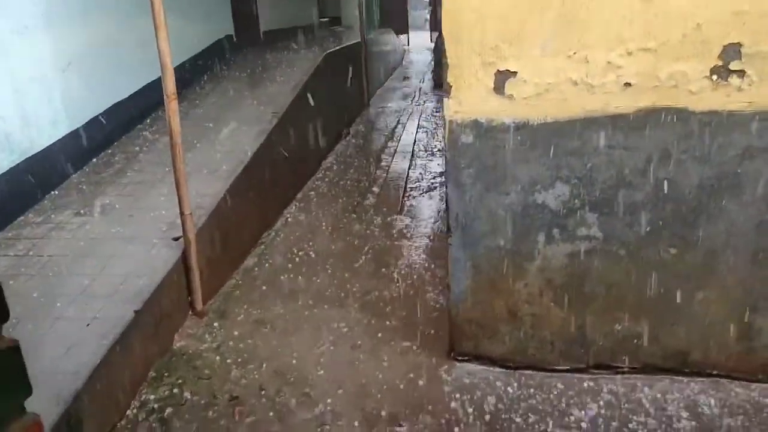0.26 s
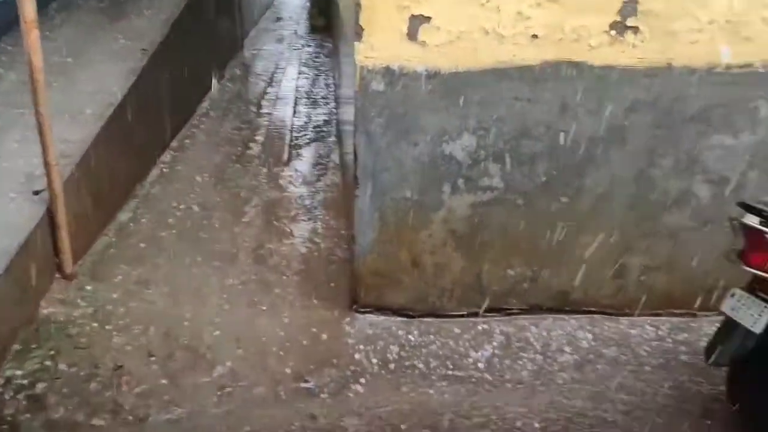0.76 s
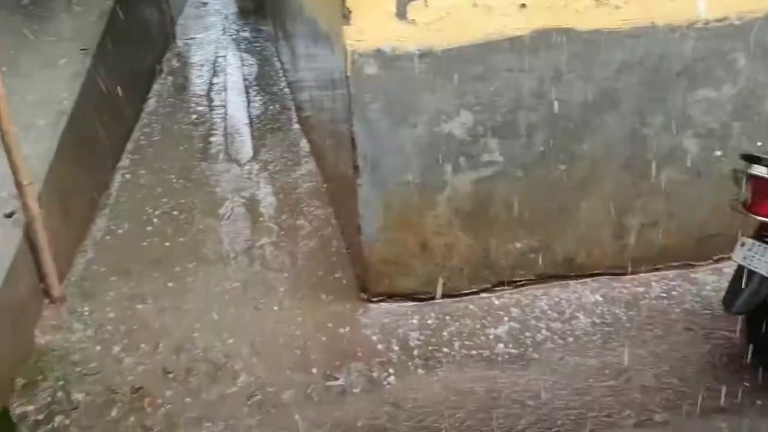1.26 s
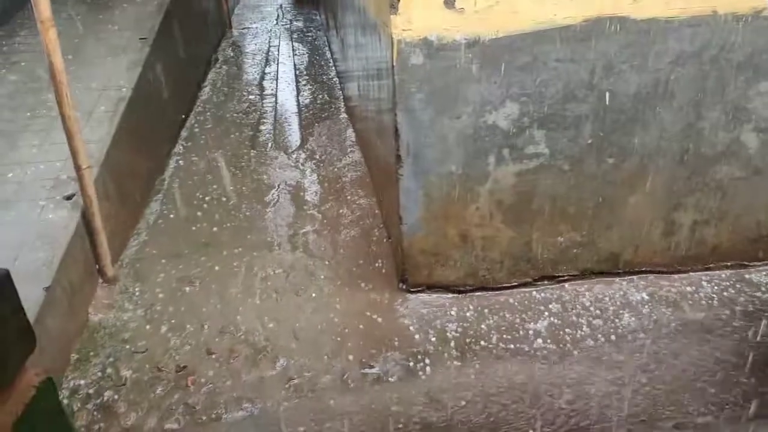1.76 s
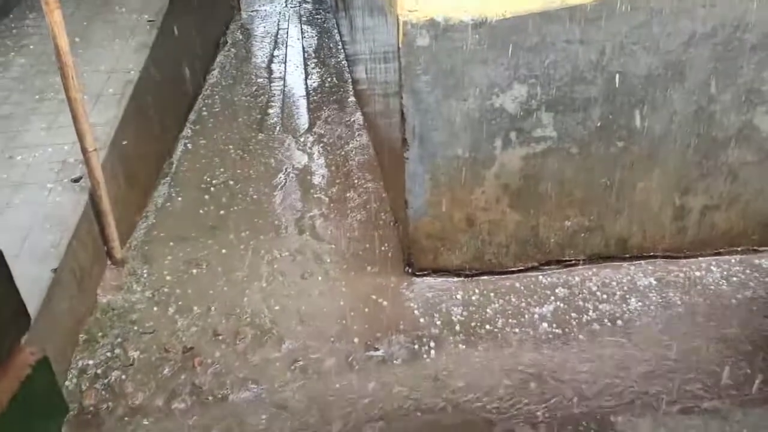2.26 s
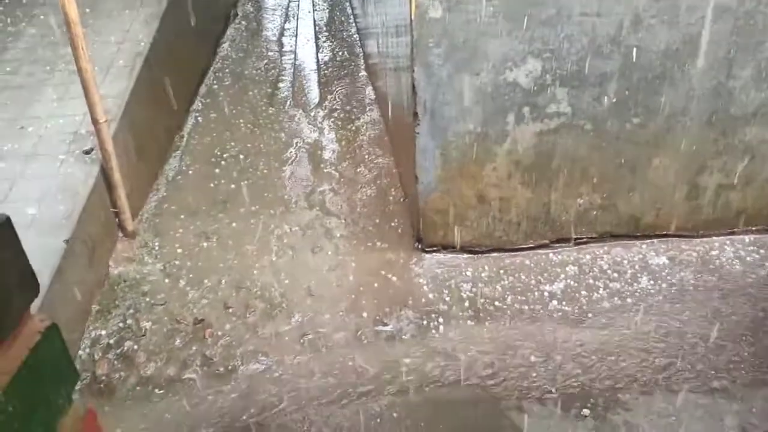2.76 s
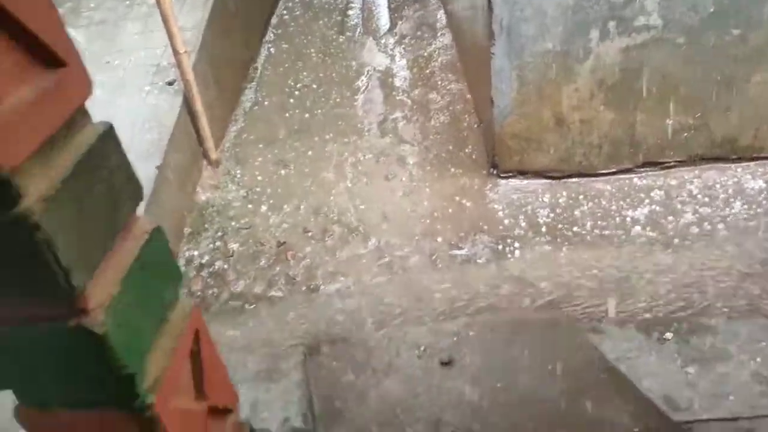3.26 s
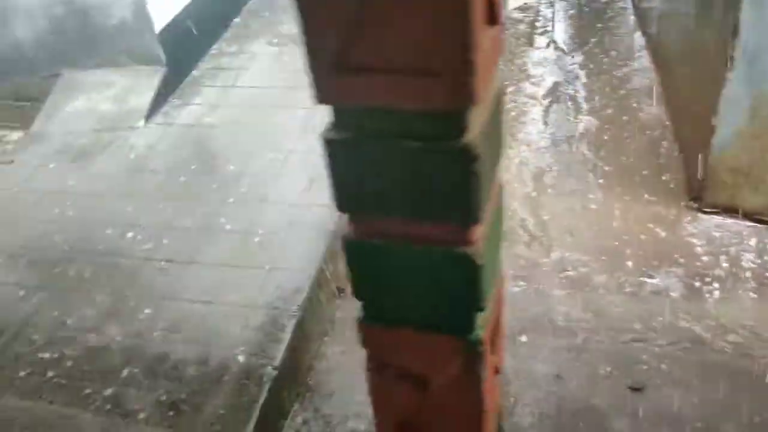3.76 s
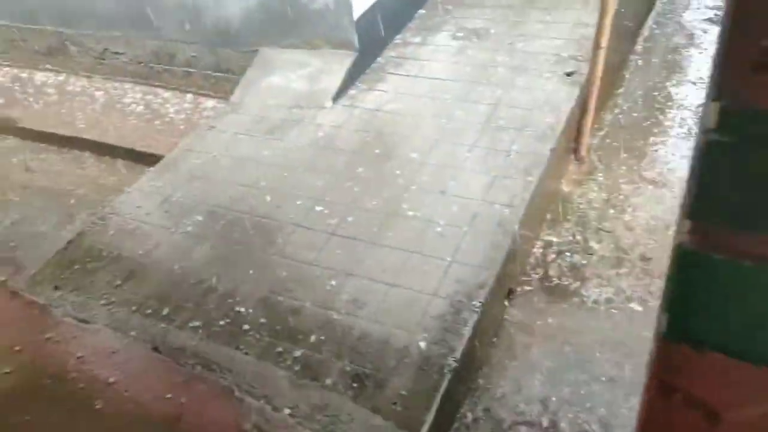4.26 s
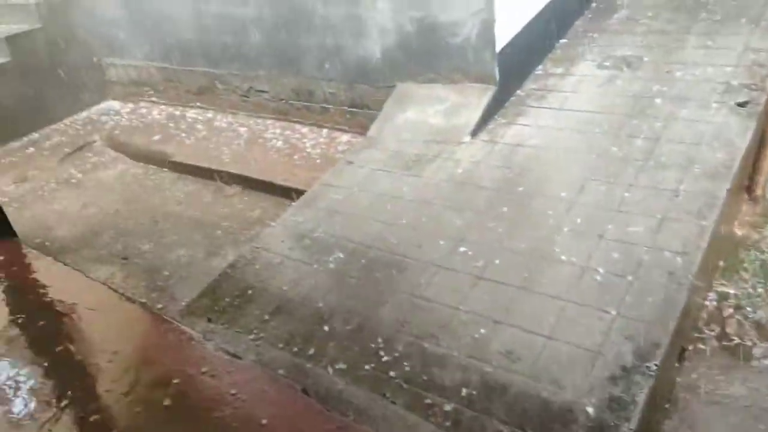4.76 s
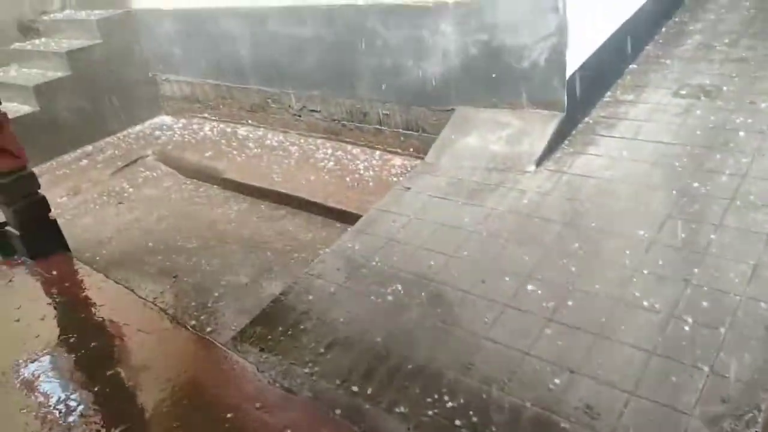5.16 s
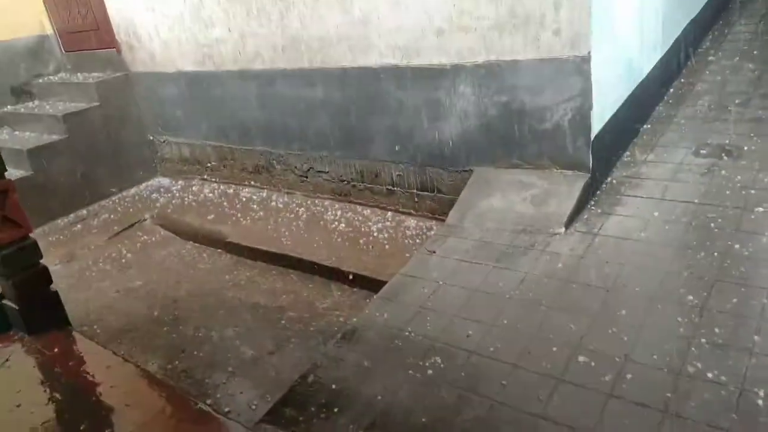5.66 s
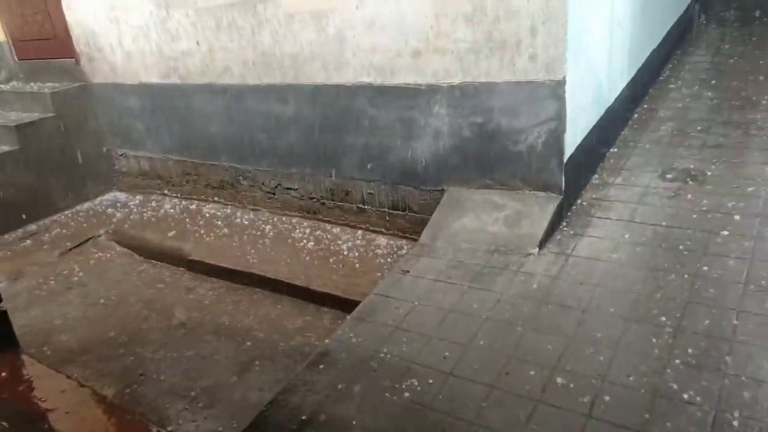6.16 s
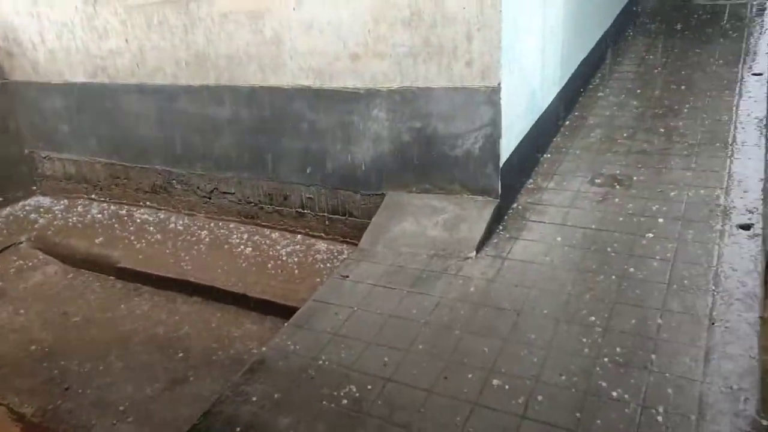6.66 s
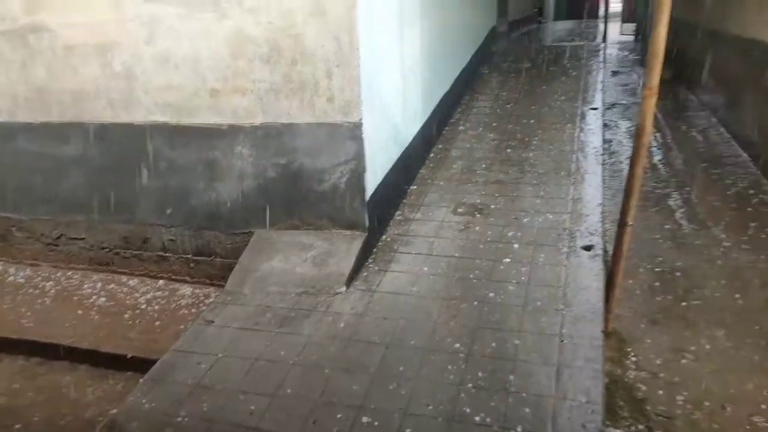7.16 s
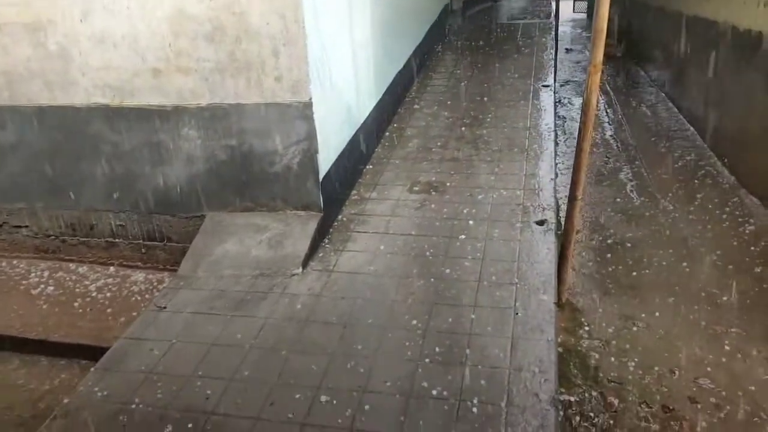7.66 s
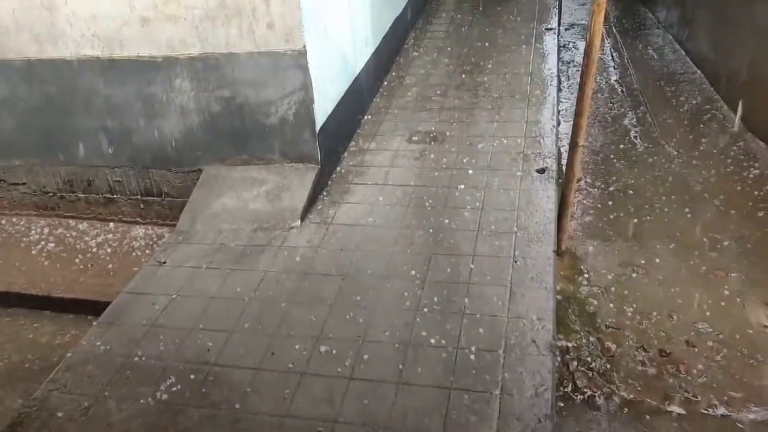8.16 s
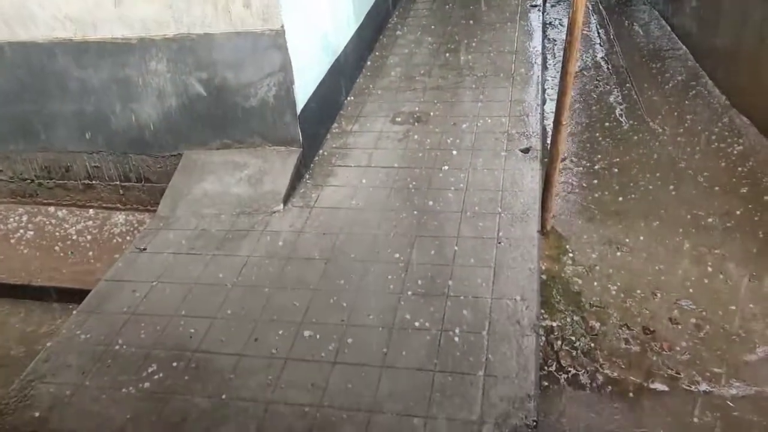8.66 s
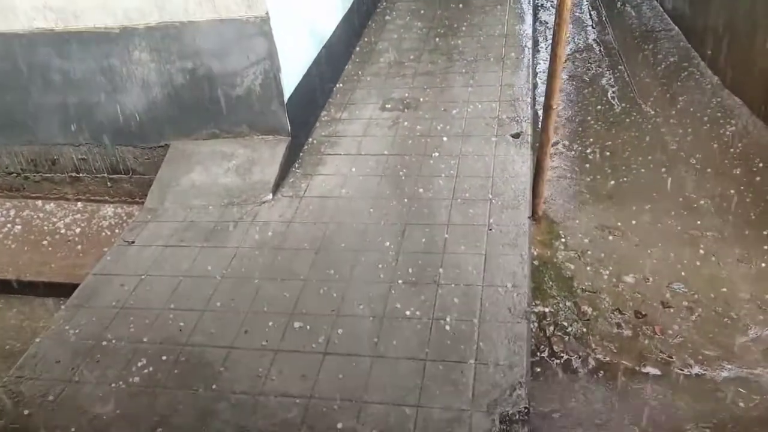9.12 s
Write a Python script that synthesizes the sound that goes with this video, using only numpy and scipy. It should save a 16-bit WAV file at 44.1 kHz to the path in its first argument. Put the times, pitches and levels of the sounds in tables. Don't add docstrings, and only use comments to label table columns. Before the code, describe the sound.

Dense, bright rain hiss runs throughout about 9.4 seconds, with grainy near drops and only a weak low roar. Hailstones strike irregularly, many per second, on roofing, tile, concrete, puddles and hollow plastic. From 0 to 1.4 s there are thuds, ticks and low hollow knocks, with cracks near 0.35 s and a tiny dropout at 1.1. A hard snap lands at 1.5. The rain eases slightly around 2.7-3.2 s as a tight cluster of ringing cracks hits at 2.9-3.05. Strong strikes follow at 4.1-4.9, 5.7 and 6.05-6.65, with faint low sheet booms near 5.8 and 6.3. The sharpest crack comes at 7.8, then more at 8.2-8.6 and 9.0-9.3, while rain swells near 9 and dips at the end. Phone microphone under a porch: near-mono, dull above the upper treble, short wall echoes, clipped crackles and small pops on the loudest stones.

```python
import sys
import numpy as np
from scipy import signal
from scipy.fft import rfft, irfft, next_fast_len
from scipy.io import wavfile
from scipy.ndimage import uniform_filter1d, minimum_filter1d

SR = 44100
rng = np.random.default_rng(int(sys.argv[2]) if len(sys.argv) > 2 else 0)


def convert_level_to_amplitude(level_db):
    exponent = np.asarray(level_db, float) / 20
    return 10 ** exponent


def transcribe(u):
    v = np.clip(np.atleast_2d(u).T, -1, 1)
    q = np.round(v * 32767).astype(np.int16)
    wavfile.write(sys.argv[1], SR, q)


N = 414089
EDGE_HZ, TOP_HZ = 9660, 15850

# time_s, level_db
RAIN_LEVEL = [(0.0, -17.5), (0.91, -16.5), (1.49, -15.5), (2.67, -19), (2.88, -17.5), (3.08, -21),
              (3.22, -20), (3.9, -17.5), (4.76, -16.5), (5.23, -16.5), (5.65, -17.5), (7.0, -16.5),
              (9.05, -14.5), (9.39, -20)]
# freq_hz, density_db
RAIN_COLOUR = [(18, -39.5), (30, -26), (208, -21.5), (302, -8.5), (637, -10.5), (1090, -4.5), (1470, -6.5),
               (2240, -3), (4730, -5.5), (5970, 1), (7370, -7), (7900, -3), (10300, -47), (17400, -120)]
# freq_hz, gain_db
CRACK_COLOUR = [(100, -10), (400, -3), (1000, 2), (2500, 4), (4600, -0.5), (6000, 5), (7300, -2), (8000, 1)]
# freq_hz, t60_s
YARD_T60 = [(300, 0.88), (1000, 0.53), (3000, 0.52), (7000, 0.32)]
# freq_hz, gain_db
BAND_EDGE = [(7200, -1), (7650, -7), (7960, -24.5), (8255, -21.5), (8290, -41.5), (9500, -67)]
# start_s, peak_db
SHEET_BOOMS = [
    (0.041, -35),
    (0.388, -36),
    (1.105, -35),
    (2.341, -38),
    (5.822, -30),
    (6.343, -28),
    (6.68, -36),
    (8.561, -32),
]
# start_s, peak_db, ring_hz
CLEAR_RINGS = [(0.356, -14, 1550), (1.086, -9, 2880), (2.069, -5, 7130), (2.893, -10, 2067),
               (2.951, -15, 7493), (2.989, -10, 6890), (3.011, -4, 5450), (3.03, -2, 6373),
               (3.035, -19, 7500), (3.522, -6, 6630), (4.04, -8, 2680), (4.918, -1.5, 6250),
               (5.735, -8, 4420), (5.803, -11, 3445), (6.064, -9, 1920), (6.308, -3, 6320),
               (6.463, -20, 1560), (6.797, -13, 5600), (6.852, -3, 2350), (6.862, -19, 1450),
               (7.077, -9, 4100), (7.537, -8, 7200), (8.534, -4, 6804), (8.534, -12, 7360),
               (8.557, -1, 6230), (9.197, -6, 6540),
               (1.287, -11.5, 1010),
    (4.002, -16, 1910),
    (3.7, -10, 1900),
    (0.9, -25, 1400),
]
# start_s, peak_db
NEAR_TICKS = [(.6404, -13), (1.146, -12), (1.6254, -4), (1.9884, -1), (2.2372, -18), (2.339, -9),
              (3.2319, -5), (4.1754, -8), (4.69, -14), (4.8325, -5), (5.561, -13), (6.3705, -11),
              (6.6991, -10), (7.4512, -5), (7.7987, -8), (8.3895, -5.5), (8.4158, -7), (9.049, -8),
              (2.994, -10), (6.077, -1), (.0029, -4), (.52, -10), (1.3191, -7), (1.5859, -7), (1.6524, -9),
              (1.699, -10), (1.8678, -8.5), (2.0189, -7.5), (2.0338, -9), (2.7714, -9), (4.1392, -6),
              (4.4055, -11), (4.6546, -12), (4.8796, -10), (5.3436, -10), (5.7525, -5), (6.344, -8),
              (6.9109, -7), (7.186, -10), (8.613, -9), (8.7834, -8), (9.0832, -9)]
# start_s, peak_db, ring_hz, echo_db
ROOF_HITS = [(.001, 0, 2360, 6.5), (.080, -3.5, 1380, 24), (.208, 4.5, 2900, -4.5), (0.774, 1.5, 1020, -16),
             (1.241, -8, 1780, 0), (1.287, -0.5, 1050, -6), (1.645, -2.5, 1870, 4.5),
             (2.159, 2.5, 2270, -17), (2.405, 1.5, 996, -6.5), (2.706, 6.5, 2880, -9.5),
             (3.032, 3, 4000, -5.5), (3.404, -4.5, 1820, 6), (3.615, 4.5, 2870, -9.5),
             (4.042, -1, 2800, -3.5), (4.441, 5, 2030, -8), (4.7657, 9, 1020, -10.5),
             (4.877, 0, 3800, -13.5), (4.920, -2, 2920, 3), (5.133, 1, 1780, -12.5), (5.343, -3, 2870, 5),
             (5.379, -5.5, 2000, 10), (5.738, 9.5, 2950, -12.5), (6.065, 6.5, 1860, -13),
             (6.630, -2, 2270, 3.5), (6.725, 3, 1950, -6), (6.799, 3, 970, -21), (8.479, 4, 2960, -10.5),
             (8.538, 2.5, 1450, -3.5), (8.999, 5.5, 2780, -9.5), (9.381, 5, 2190, -2.5)]
# start_s, peak_db, ring_hz, echo_db
TILE_HITS = [(.507, 3, 1950, -10), (1.088, 2, 2900, -5), (1.317, 2.5, 2720, -13), (2.868, -1.5, 2930, -8),
             (2.894, 10.5, 2850, -16), (3.525, 7.5, 2720, -15.5), (3.574, 1.5, 2360, -6.5),
             (3.860, 2, 3770, -7.5), (4.295, -5, 3250, -7), (4.311, 2.5, 3500, -10.5),
             (4.457, 8, 3400, -15), (4.68, 5, 3020, -9.5), (4.897, 10, 2750, -21), (5.452, 1.5, 2340, -12),
             (5.691, 6.5, 4270, -8), (6.145, 2.5, 4350, -2), (6.853, 3.5, 2400, 0), (7.081, 3.5, 4040, -7),
             (7.451, 4, 3000, -12.5), (7.52, 5, 3040, -12), (7.539, -1, 3400, -8.5),
             (7.651, 3.5, 2410, -8.5), (7.886, 4, 2920, -25), (8.207, 7.5, 3600, -14.5),
             (8.3873, 4.5, 2920, -24), (8.691, -2.5, 2020, -8.5), (9.046, 3.5, 2780, 0),
             (1.586, -12, 2730, -19), (.124, -2, 2120, -6), (7.12, 1, 2620, -6.5)]
# start_s, peak_db, ring_hz, echo_db
CONCRETE_HITS = [(.325, 5.5, 3430, -6), (.348, 8, 960, -9), (0.471, -0.5, 2580, -15),
                 (1.5136, 10, 2850, -16), (1.626, 2, 2340, -17), (1.865, 0.5, 2680, -2),
                 (1.981, 5, 2500, -0.5), (2.031, 1, 2960, -1), (2.320, -6, 1630, -5),
                 (2.951, 6.5, 3060, -9.5), (2.986, 6, 4100, -2), (3.014, 3, 3400, -5), (3.231, -1, 2450, 5),
                 (4.127, 8.5, 2020, -8.5), (4.229, 6.5, 2460, -9), (4.365, 3, 3020, -9.5),
                 (4.394, 9, 2300, -13), (4.773, 9, 4400, -23), (5.158, 4.5, 2980, -20),
                 (5.806, 3, 2500, -4), (7.805, 13, 2570, -8), (7.868, 5.5, 2500, -9),
                 (7.950, 7.5, 2490, -23), (8.063, 3.5, 2790, -1), (8.295, 8, 3980, -10),
                 (8.4192, 10.5, 3030, -8.5), (9.149, 2, 4070, -8.5), (9.157, 4.5, 2830, -8),
                 (9.200, 7, 2170, -12.5), (9.288, 7.5, 2670, -8.5)]
# start_s, peak_db, ring_hz, echo_db
PUDDLE_HITS = [(.639, 5, 2830, -15.5), (.822, -0.5, 2640, -9), (1.144, 1.5, 1080, 1),
               (1.163, -11, 1270, -3.5), (1.370, 1, 2860, -4.5), (1.429, 1.5, 1170, -13),
               (1.782, 1.5, 2960, -5.5), (2.072, 6, 2970, -11), (2.139, 0, 2270, 7),
               (2.233, -2.5, 3300, -4), (2.642, -3.5, 3000, 1.5), (2.753, 1, 1760, -13),
               (2.914, 5.5, 2440, -11), (3.594, 3.5, 2040, -4), (3.693, -1.5, 3000, 1.5),
               (4.003, 4, 1980, -7), (5.874, -2, 2400, 3), (6.038, 6.5, 2500, -8.5), (6.308, 3, 2270, -2),
               (6.345, 0.5, 2700, -3), (6.459, 3.5, 4300, -3.5), (6.645, 7, 1960, -7.5),
               (6.894, 6.5, 2190, -11.5), (7.04, -1, 2900, -1), (7.210, 3.5, 2970, -7),
               (7.311, 1.5, 3410, -7.5), (7.428, 4.5, 2580, -10), (7.959, 7.5, 3280, -7.5),
               (8.558, 8, 2400, -8), (8.937, 3.5, 2970, -8.5)]
# start_s, peak_db, ring_hz, echo_db
PAVING_HITS = [(0.168, -9, 2070, -8), (0.18, -1, 2840, -11), (0.394, -2.5, 2800, -8),
               (0.438, -0.5, 1810, -3.5), (0.713, -2, 2110, -6.5), (0.86, -2.5, 2280, -9.5),
               (0.897, -4.5, 3620, -1.5), (1.005, -3, 2220, -17), (1.058, -2.5, 3270, -8),
               (1.124, -12.5, 3620, 2), (1.243, 0.5, 1840, -7.5), (1.318, -4, 1770, -8),
               (1.533, 4.5, 2710, -15), (1.583, -6, 2800, 0.5), (1.713, 2, 2450, -13),
               (2.129, 0, 2870, -10), (2.361, -2.5, 2970, -7.5), (2.374, -9.5, 2150, -10),
               (2.614, 2, 2740, -15.5), (2.681, -3, 2970, -4.5), (2.77, -7, 2330, -14),
               (3.014, 9, 3280, -21.5), (3.289, -1, 2760, -11), (3.906, -5, 2800, -3.5),
               (4.366, -7.5, 2970, -6.5), (4.635, 0, 3160, -4.5), (4.863, 1, 1210, -12.5),
               (4.879, -2.5, 3820, -2), (4.921, 0, 2710, -12.5), (4.971, 4.5, 3920, -20.5),
               (5.05, -3, 4440, -6.5), (5.278, 0.5, 2850, -10), (5.411, -3, 2520, -1),
               (5.516, -5.5, 3060, 0.5), (5.848, -4.5, 3270, -11), (6.018, -1.5, 3140, -5),
               (6.27, -0.5, 2890, -6.5), (7.003, -5, 3530, -10), (7.184, -5, 3270, -16.5),
               (7.408, -5, 2900, -13), (7.727, -3.5, 4230, -3.5), (7.929, -8, 3060, -15),
               (8.276, 3.5, 3000, -9.5), (8.728, -3.5, 2400, -2), (8.783, -1, 2840, -5),
               (8.821, -9.5, 4090, -19.5), (8.957, 3.5, 4100, -10.5), (9.104, -2, 4220, -7),
               (9.159, -2.5, 2850, -8), (9.358, -3.5, 3010, -6)]
# start_s, peak_db, ring_hz, echo_db
HOLLOW_HITS = [(.040, -3, 990, -1.5), (.122, -5, 950, -5), (.508, -11, 910, -1), (.640, -9.5, 1050, 1.5),
               (.788, -11, 990, -10), (1.002, -9, 1300, -3), (1.159, -5.5, 1100, -12.5),
               (1.288, -6, 1020, -17), (1.322, -6.5, 1200, -6.5), (1.663, -9, 1000, -10),
               (1.515, -7, 1140, -5), (2.099, -12, 1000, -9), (2.895, -3, 1010, -9), (3.426, -5, 900, -10),
               (6.817, -7, 1020, -5), (6.863, -9, 1000, -11), (7.665, -9.5, 1000, -6),
               (8.427, -6.5, 950, -10.5), (8.575, -4.5, 1900, -16), (5.361, -9, 706, -2),
               (5.742, -4, 1040, -1), (5.698, -10, 1500, 3)]
# bass_tilt_db, treble_tilt_db
SURFACE_TILTS = [
    (2.5, 5),
    (-13, 0),
    (-1, 7.5),
    (-2, 1),
    (-2, 2.5),
    (5.5, -4),
]
# centre_s, low_hz, high_hz, level_db
SIDE_BURSTS = [
    (2.823, 4550, 6400, -29),
    (3.705, 5500, 7100, -25),
    (5.005, 5460, 8100, -20),
    (6.956, 5500, 7700, -21),
    (7.699, 4900, 8900, -20),
    (8.744, 4722, 8250, -24),
]
# start_s, peak_db, smear_db (relative)
CUT_PEAKS = [(1.1009, -25.0, -48.0), (1.5159, -34.0, -39.0), (2.8977, -29.0, -36.0), (2.9164, -33.0, -34.0),
             (3.0159, -27.0, -25.0), (3.0359, -29.0, -26.0), (3.5254, -32.0, -45.0), (4.1332, -34.0, -35.0),
             (4.4583, -31.0, -45.0), (4.6808, -35.0, -40.0), (4.7716, -27.0, -48.0), (4.7758, -28.0, -46.0),
             (4.9232, -29.0, -27.0), (5.6919, -37.0, -37.0), (5.7404, -25.0, -30.0), (6.0687, -27.0, -31.0),
             (6.3114, -36.0, -44.0), (6.6495, -32.0, -33.0), (6.8553, -34.0, -29.0), (7.4517, -24.0, -32.0),
             (7.8096, -27.0, -25.0), (8.2095, -26.0, -37.0), (8.2967, -30.0, -34.0), (8.3891, -26.0, -36.0),
             (8.4242, -33.0, -36.0), (8.5592, -25.0, -28.0), (8.5626, -25.0, -28.0), (8.5753, -36.0, -20.0),
             (9.0473, -34.0, -33.0), (9.16, -40.0, -26.0),
             (5.7452, -36, -18), (8.572, -38, -15), (8.9385, -44, -25), (9.2014, -40, -36),
                   (2.9915, -33, -42), (3.0225, -31, -40), (4.7672, -30, -45), (4.898, -42, -24),
                   (4.9205, -31, -45), (6.0405, -38, -36), (6.6455, -40, -45), (1.105, -33, -45),
                   (8.4195, -34, -45), (1.1167, -43, -45)]
# from_s, floor_hz
CUT_FLOOR = [(0, 8600), (2.8, 9600), (3.0, 10200), (3.1, 8600), (4.8, 10300), (5.6, 8600), (6.05, 10600),
             (6.2, 9400), (7.4, 9500), (7.7, 10200), (8.1, 8800), (8.5, 10000), (8.9, 11200), (9.0, 11600),]
# start_s, peak_db
EDGE_SPILLS = [
    (.349, -32),
    (3.241, -37),
    (7.801, -40),
]
# start_s, size_db, direction_sign, recovery_ms
REST_JUMPS = [(0.349, -27, -1, 3.7), (1.5155, -29, -1, 8.5), (2.071, -30, -1, 2.6), (2.151, -29, -1, 14),
              (2.895, -18, -1, 1.9), (3.017, -13, 1, 5.5), (3.5256, -24, 1, 20), (4.126, -24, -1, 34),
              (4.6816, -16, -1, 24), (4.7712, -2, 1, 1), (4.898, -25, 1, 17.0), (4.9216, -21, -1, 18),
              (5.74, -9.5, 1, 2), (6.07, -38, -1, 11), (6.314, -29, -1, 8.9), (6.648, -6, 1, 1.3),
              (6.855, -26, -1, 20), (7.4507, -24, 1, 20), (7.5397, -31, -1, 24), (7.809, -18, 1, 2.9),
              (8.2075, -24, -1, 18), (8.295, -25, -1, 26), (8.426, -20, -1, 40), (8.5631, -29, -1, 3.5),
              (8.938, -27, -1, 25), (9.047, -22, -1, 31), (9.16, -21.5, 1, 12)]
# centre_s, half_length_s, gain_db
LOST_BUFFER = (1.106, .0055, -13)


def evened(x):
    return x / np.sqrt(np.mean(x ** 2) + 1e-20)


def read(points, hz):
    f, value = np.transpose(points)
    return np.interp(np.log(hz + 1), np.log(f + 1), value)


def add(mix, s, sound):
    part = mix[max(round(s * SR), 0):][:len(sound)]
    part += sound[:len(part)]


def coloured(x, db_at):
    hz = abs(np.fft.fftfreq(4096, 1 / SR))
    log_gain = np.log(convert_level_to_amplitude(np.maximum(db_at(hz), -100)))
    taps = np.fft.ifft(np.exp(np.conj(signal.hilbert(log_gain)))).real[:2048]
    return signal.oaconvolve(x, taps)[:len(x)]


def limited(x):
    hz, db = np.transpose(BAND_EDGE)
    gain = convert_level_to_amplitude(np.interp(np.fft.rfftfreq(x.shape[-1], 1 / SR), hz, db))
    return irfft(rfft(x) * gain, x.shape[-1])


def far_wash(patchy_db=1.5, flicker_db=-1.27):
    frames = N // 128 + 5
    real, imag, patches = rng.standard_normal((frames, 257, 3)).T
    patches = uniform_filter1d(patches, size=7, axis=0)
    patches = evened(uniform_filter1d(patches, size=20, axis=1))
    flicker = evened(uniform_filter1d(rng.standard_normal(frames), size=10))
    spectrum = (real + 1j * imag) * convert_level_to_amplitude(patchy_db * patches + flicker_db * flicker)
    return signal.istft(spectrum, nperseg=512, noverlap=384)[1][:N]


def near_drops(per_s=700, spread_db=5.0, tone_db=8.0, sharpness=6.6):
    hits = convert_level_to_amplitude(spread_db * np.minimum(rng.exponential(1, N), 2.6)) * (rng.random(N) < per_s / SR)
    place = rng.integers(0, 8, N)
    t = np.arange(1500) / SR
    decay = 2.1 * convert_level_to_amplitude(-60 * t / 0.0014) + convert_level_to_amplitude(-60 * t / 0.018) + 0.14 * convert_level_to_amplitude(-60 * t / 0.054)
    splashes = rng.standard_normal((8, len(t))) * decay
    tone_hz = np.geomspace(1100, 7000, len(splashes))[:, None]
    detune = np.fft.rfftfreq(len(t), 1 / SR) / tone_hz - 1
    splashes = irfft(rfft(splashes) * (1 + convert_level_to_amplitude(tone_db) / (1 + 1j * detune * sharpness)), len(t))
    return sum(signal.oaconvolve(hits * (place == k), splash)[:N] for k, splash in enumerate(splashes))


def downpour(drops_db=-6.0, roar_db=-29, roar_follows=0.67):
    s, level_db = np.transpose(RAIN_LEVEL)
    mix = evened(far_wash()) + convert_level_to_amplitude(drops_db) * evened(near_drops())
    rain = evened(coloured(mix, lambda hz: read(RAIN_COLOUR, hz)))
    roar = signal.sosfilt(signal.butter(2, 1300, fs=SR, output="sos"), rain)
    level_db = np.interp(np.arange(N) / SR, s, level_db)
    roar_level_db = roar_db + roar_follows * (level_db + 14.0)
    return convert_level_to_amplitude(level_db - 1.5) * (rain - roar) + convert_level_to_amplitude(roar_level_db + 3.0) * evened(roar)


def roofing(mode_hz=152.2, t60_s=0.18, rise_s=0.0024, patter_db=-50.5, trim_db=6.0):
    t = np.arange(SR // 2) / SR
    mode = np.sin(2 * np.pi * mode_hz * t) * convert_level_to_amplitude(-60 * t / t60_s) * (1 - np.exp(-t / rise_s))
    out = convert_level_to_amplitude(patter_db) * evened(signal.oaconvolve(rng.standard_normal(N), mode)[:N])
    for s, db in SHEET_BOOMS:
        add(out, s - .004, convert_level_to_amplitude(db + trim_db) * mode)
    return out


def rings(t60_s=0.037, shorter=0.25, rise_s=0.0025):
    out, t = np.zeros(N), np.arange(3000) / SR
    for s, db, hz in CLEAR_RINGS:
        mode_t60_s = t60_s * (2000 / hz) ** shorter
        fade = convert_level_to_amplitude(db - 60 * t / mode_t60_s) * (1 - np.exp(-t / rise_s))
        add(out, s + .001, 2 * fade * np.sin(2 * np.pi * hz * t))
    return out


def ticks(t60_s=0.018, rise_s=0.00043, trim_db=2.0):
    out, t = np.zeros(N), np.arange(800) / SR
    envelope = convert_level_to_amplitude(-60 * t / t60_s) * (1 - np.exp(-t / rise_s))
    for (s, db), grit in zip(NEAR_TICKS, rng.choice([-1., 1.], (len(NEAR_TICKS), len(t)))):
        snap = coloured(grit * envelope, lambda hz: read(CRACK_COLOUR, hz))
        add(out, s - .001, convert_level_to_amplitude(db + trim_db) * snap / abs(snap).max())
    return out


def echoes(count, size=10240):
    hz, t, z = signal.stft(rng.standard_normal((count, size)), SR, nperseg=256)
    decay = convert_level_to_amplitude(-60 * t / read(YARD_T60, hz)[:, None])
    return signal.istft(z * decay, SR, nperseg=256)[1][:, :size]


def hail(snap_t60_s=0.017, rise_s=0.00031, ring_db=3.5, ring_t60_s=0.022, gap_s=0.0034, repeat_db=-5.0,
         trim_db=-15.0):
    surfaces = (ROOF_HITS, TILE_HITS, CONCRETE_HITS, PUDDLE_HITS, PAVING_HITS, HOLLOW_HITS)
    stones = [(*row, *tilts) for table, tilts in zip(surfaces, SURFACE_TILTS) for row in table]
    out, tails = np.zeros(N), echoes(count=64)[np.arange(len(stones)) % 64]
    t = np.arange(tails.shape[1]) / SR
    hz = np.fft.rfftfreq(len(t), 1 / SR)
    grits, delays = rng.choice([-1., 1.], tails.shape), rng.random((len(stones), 4))
    bass = 1 / (1 + (hz / 1800) ** 4)
    treble = 1 / (1 + (4500 / (hz + 1)) ** 8)
    attack = 1 - np.exp(-t / rise_s)
    for (s, peak_db, ring_hz, echo_db, bass_db, treble_db), grit, tail, delay in zip(
            stones, grits, tails, delays):
        late_s = .0022 * (delay + np.arange(4) + .6)[:, None]
        since_s = t - late_s
        repeats = (since_s > 0) * convert_level_to_amplitude(repeat_db - 800 * late_s - 60 * abs(since_s) / snap_t60_s)
        crack = grit * (convert_level_to_amplitude(-60 * t / snap_t60_s) + repeats.sum(axis=0))
        echo = convert_level_to_amplitude(echo_db) * tail * (1 - np.exp(-(t / gap_s) ** 2))
        tilt = convert_level_to_amplitude(bass * bass_db + treble * treble_db)
        detune = 2j * np.pi * (hz - ring_hz) * ring_t60_s / np.log(1000)
        body = 1 + convert_level_to_amplitude(ring_db) / (1 + detune)
        spectrum = (rfft(crack) * body + rfft(echo) * np.sqrt(abs(body))) * tilt
        sound = irfft(spectrum, len(t)) * attack
        sound /= np.sqrt(np.mean(sound[:260] ** 2))
        add(out, s - .0003, convert_level_to_amplitude(peak_db + trim_db) * sound)
    click = np.r_[1., np.zeros(2047)]
    colour = coloured(click, lambda hz: read(CRACK_COLOUR, hz) - 40 * (hz > EDGE_HZ))
    return signal.oaconvolve(out, colour / np.linalg.norm(colour))[:N] * 1.17


def scene():
    return np.tile(downpour() + roofing() + rings() + ticks() + hail(), (2, 1))


def side_bursts():
    out, size = np.zeros(N), 2048
    hz = np.fft.rfftfreq(size, 1 / SR)
    for (s, low_hz, high_hz, db), noise in zip(SIDE_BURSTS, rng.standard_normal((len(SIDE_BURSTS), size))):
        band = irfft(rfft(noise) * (hz > low_hz) * (hz < high_hz))
        add(out, s - size / SR / 2, convert_level_to_amplitude(db) * limited(evened(band)) * np.hanning(size))
    return out


def splatter(uneven_db=3.0, gap_db=-28.0, spill_hz=9300.0, needle_db=13.5, haze_db=-5.5, haze_ms=17, late_ms=1):
    out, ms = np.zeros(N), np.arange(-2048, 2048) * 1000 / SR
    hz, cuts = np.fft.rfftfreq(len(ms), 1 / SR), CUT_PEAKS
    starts_s, floors_hz = np.transpose(CUT_FLOOR)
    bands = rng.standard_normal((len(cuts), 32))[:, (hz // 800).astype(int)]
    skirt = 1 / (1 + (hz / spill_hz) ** 24)
    needle = rfft(1. * (ms == 0))
    haze_shape = np.exp(-((ms - late_ms) / haze_ms) ** 4)
    for (s, db, smear_db), noise, band in zip(cuts, rng.standard_normal((len(cuts), len(ms))), bands):
        floor_hz = floors_hz[np.searchsorted(starts_s, s) - 1]
        kept = np.clip((hz - floor_hz) / 250 + .5, 0, 1) ** 2
        haze = rfft(convert_level_to_amplitude(smear_db + haze_db) * noise * haze_shape) * kept * convert_level_to_amplitude(uneven_db * band)
        click = needle * np.maximum(kept, skirt + convert_level_to_amplitude(gap_db))
        add(out, s + ms[0] / 1000, convert_level_to_amplitude(db + needle_db) * irfft(haze + click))
    for s, db in EDGE_SPILLS:
        add(out, s + ms[0] / 1000, convert_level_to_amplitude(db + needle_db) * irfft(needle * skirt))
    return signal.sosfiltfilt(signal.butter(3, [8600, TOP_HZ], "band", fs=SR, output="sos"), out)


def jolts(rise_ms=0.14, rebound=0.45, slow_ms=53.0):
    out, ms = np.zeros(N), np.arange(SR // 3) * 1000 / SR
    for s, db, way, back_ms in REST_JUMPS:
        shape = np.exp(-ms / back_ms) - rebound * back_ms / slow_ms * np.exp(-ms / slow_ms)
        add(out, s - .001, np.sign(way) * convert_level_to_amplitude(db + 1.5) * shape * (1 - np.exp(-ms / rise_ms)))
    return out


def roll_off(x):
    return signal.sosfilt(signal.butter(12, 15850, fs=SR, output="sos"), x)


def record(dry):
    padded = np.pad(dry[:1], [(0, 0), (0, next_fast_len(N) - N)])
    narrow = limited(padded)[:, :N]
    s, half_s, db = LOST_BUFFER
    narrow = narrow * convert_level_to_amplitude(db * np.exp(-((np.arange(N) / SR - s) / half_s) ** 4))
    rest = jolts()
    room_left = np.clip((.99 - np.sign(narrow) * rest) / (abs(narrow) + 1e-9), 0, 1)
    ceiling_gain = uniform_filter1d(minimum_filter1d(room_left, size=17), size=9)
    held = narrow * ceiling_gain + rest
    held = signal.sosfiltfilt(signal.cheby2(8, 60, EDGE_HZ + 1500, fs=SR, output="sos"), held)
    return roll_off(held + splatter() + side_bursts() * np.array([[1], [-1]]))


dry = scene()
out = record(dry)
transcribe(out)
```